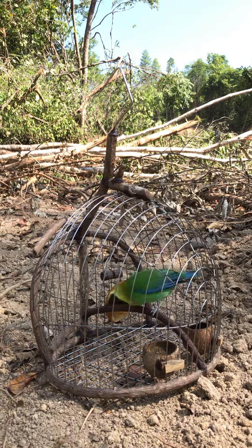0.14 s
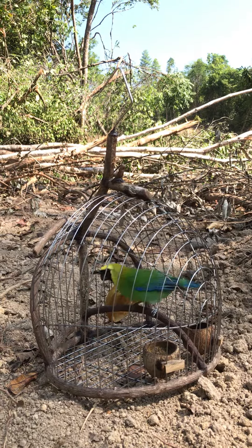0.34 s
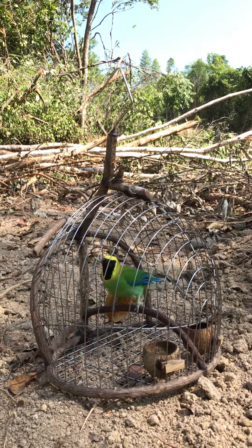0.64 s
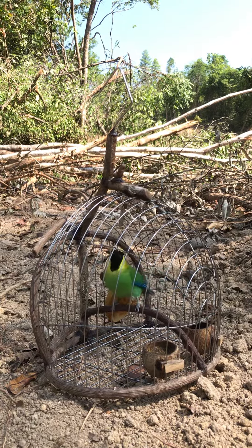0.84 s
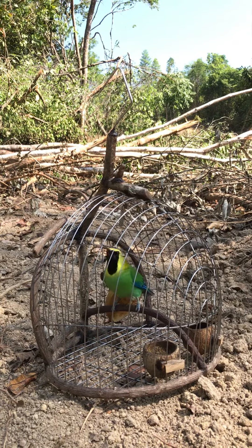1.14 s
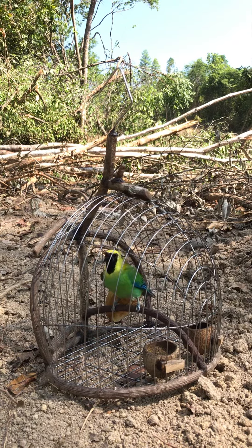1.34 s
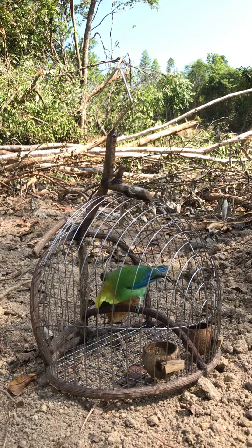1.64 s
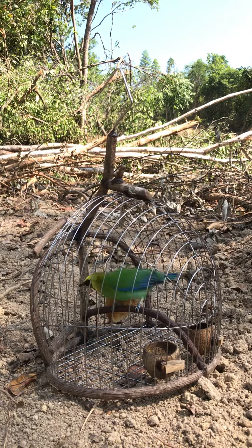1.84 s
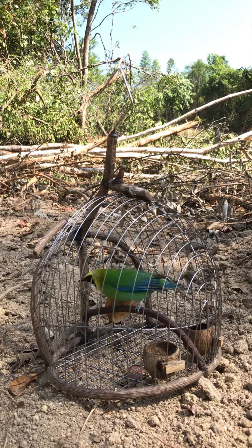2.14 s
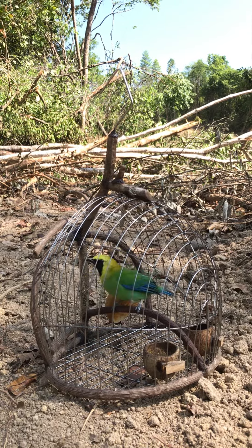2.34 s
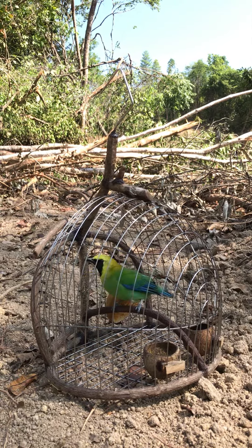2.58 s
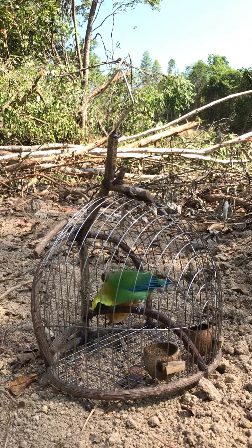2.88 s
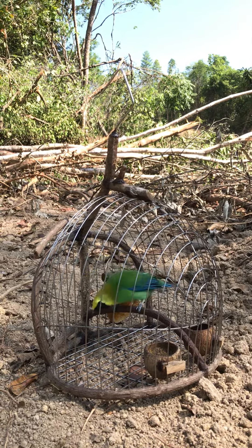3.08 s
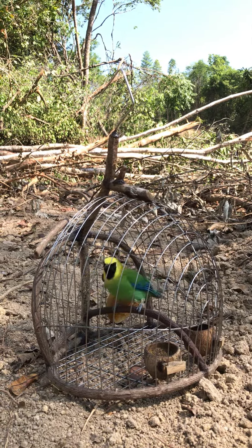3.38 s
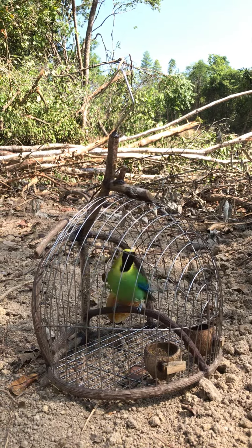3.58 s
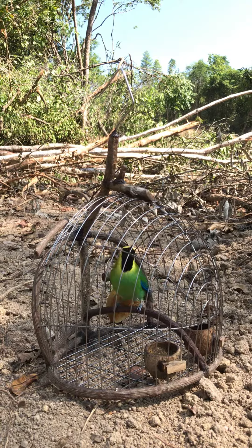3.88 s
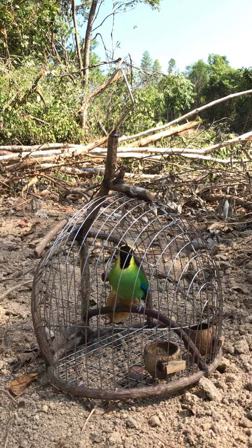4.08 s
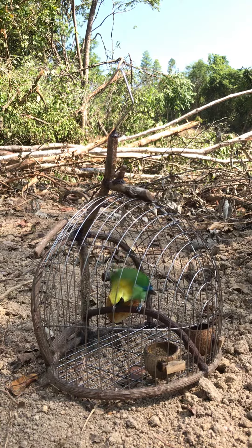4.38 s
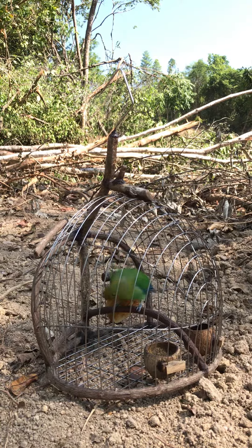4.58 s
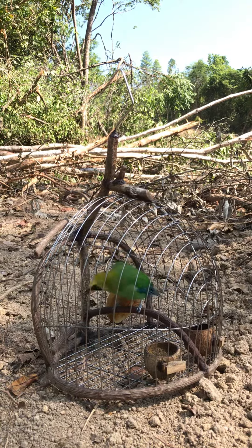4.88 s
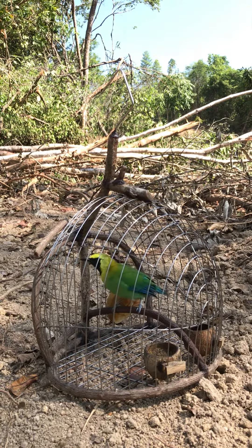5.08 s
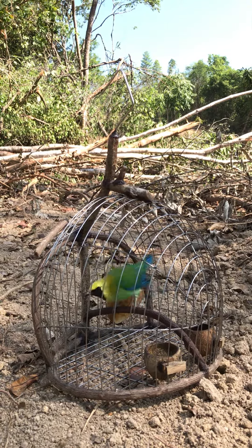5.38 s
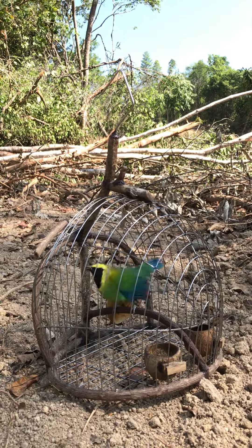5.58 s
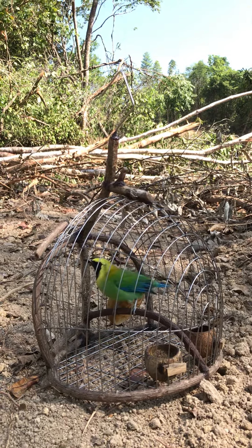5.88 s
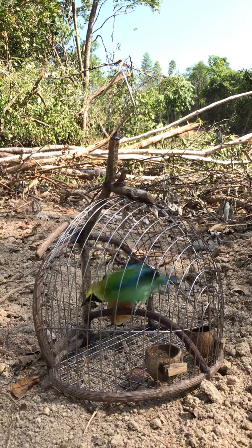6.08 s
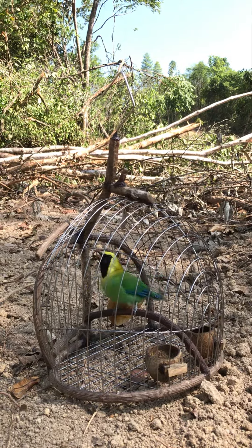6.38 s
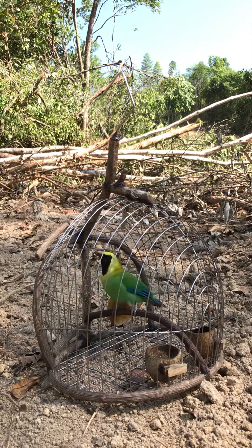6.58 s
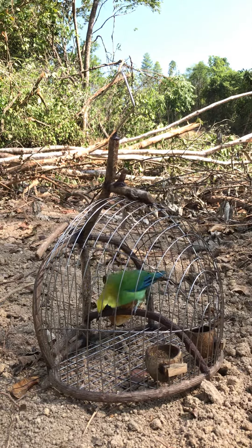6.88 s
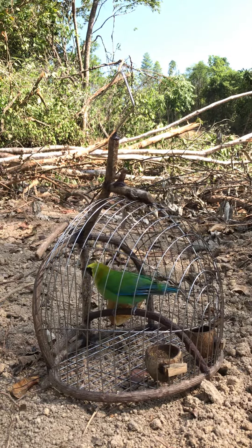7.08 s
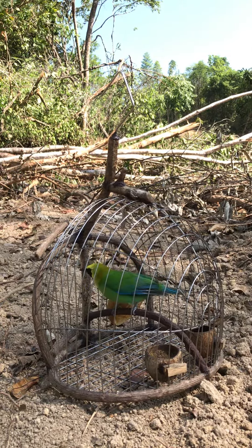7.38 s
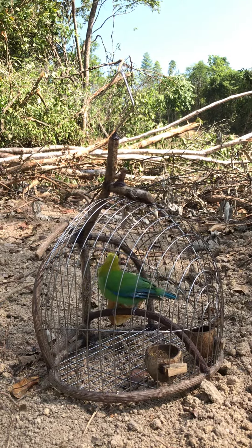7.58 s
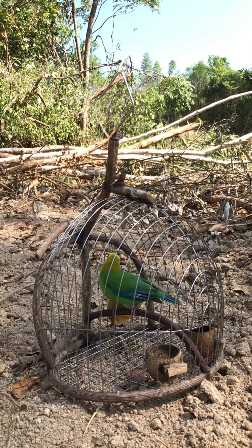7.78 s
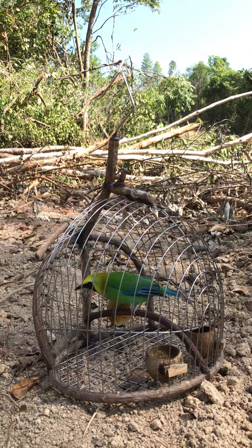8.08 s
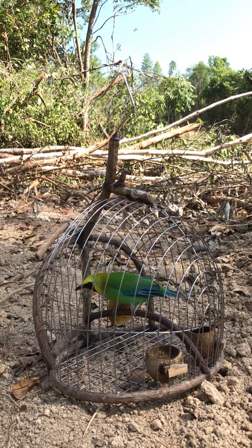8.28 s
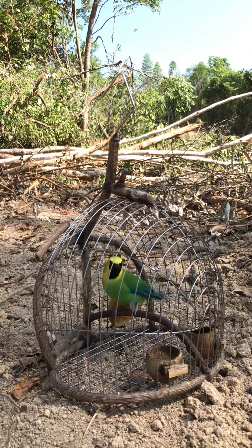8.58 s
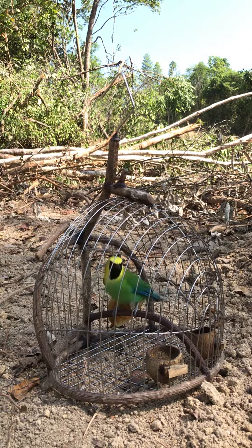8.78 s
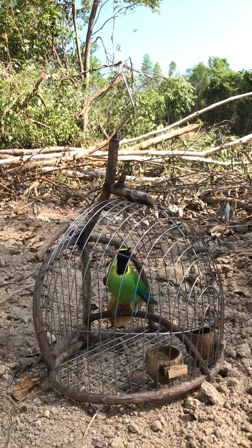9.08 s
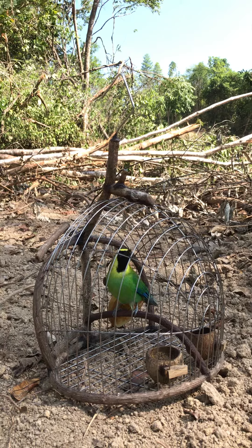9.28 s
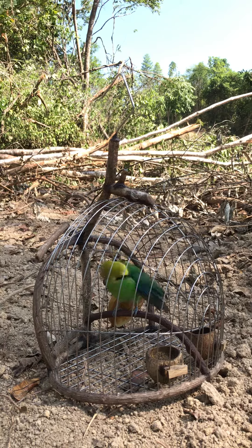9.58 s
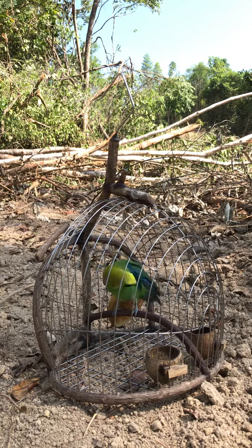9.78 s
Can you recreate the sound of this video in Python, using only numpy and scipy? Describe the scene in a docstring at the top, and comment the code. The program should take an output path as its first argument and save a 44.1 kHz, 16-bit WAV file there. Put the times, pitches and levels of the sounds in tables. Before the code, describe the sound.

Bright, gliding chirps from a nearby bird come in brief bursts, while an outdoor background of insects and low rumble fades and returns.

```python
"""A forest clearing sounds with cicada noise bands, a beating cricket tone, far birds, rumble and hum.
At 0.6 s a caged songbird whistles close by: short gliding tones with weak harmonics and a slight flutter.
At 2.4 s the background is turned far down. The bird sings at 3.5 s, ticks its claws on the cage wire
from 5.3 s and sings again from 5.5 s. At 7.2 s the background returns, far trills echo among the trees,
and the bird gives a last phrase at 8.9 s. From 9.4 s the background is down again."""
import sys
import numpy as np
from scipy import signal
from scipy.fft import rfft, irfft, next_fast_len
from scipy.io import wavfile
from scipy.ndimage import uniform_filter1d, map_coordinates

SR = 44100
rng = np.random.default_rng(int(sys.argv[2]) if len(sys.argv) > 2 else 0)


def wav_out(sig):
    """Save sig, one row per channel (or a flat mono array), as 16-bit PCM at SR to the path in sys.argv[1]."""
    wavfile.write(sys.argv[1], SR, np.round(np.clip(np.atleast_2d(sig).T, -1, 1) * 32767).astype(np.int16))


N = 438354
T = np.arange(N) / SR
COARSE = T[::64]  # time grid of slow controls [s]


def songbird():
    """Frequency modulation: each note is a gliding sine with weak harmonics locked to its phase."""
    # one curve a note: (time [s], pitch [Hz], level [dB])
    notes = [
        [(0.616, 2840, -43), (0.625, 2926, -33), (0.634, 3397, -26.5), (0.645, 3100, -21.5),
         (0.653, 2740, -24.5), (0.665, 2700, -26), (0.674, 2630, -42)],
        [(0.688, 2444, -19.5), (0.707, 2856, -22.5), (0.716, 2970, -14), (0.726, 2366, -29),
         (0.729, 2654, -23.5), (0.753, 2969, -16.5), (0.762, 2606, -33)],
        [(1.022, 2404, -40), (1.034, 2575, -24.5), (1.047, 3230, -19), (1.067, 2590, -18.5),
         (1.071, 2598, -17.5), (1.08, 2820, -36)],
        [(1.087, 3328, -29.5), (1.11, 3265, -21.5), (1.12, 3040, -17.5), (1.149, 3245, -15.5),
         (1.158, 3640, -16.5), (1.164, 3397, -9), (1.177, 3194, -34.5)],
        [(3.483, 2970, -47), (3.501, 2976, -30), (3.51, 3180, -30), (3.519, 2910, -46)],
        [(3.688, 3040, -43), (3.704, 2943, -34.5), (3.715, 3166, -28.5), (3.723, 3000, -49)],
        [(3.81, 1830, -44.5), (3.815, 2295, -48), (3.818, 2750, -31), (3.825, 2460, -29), (3.833, 2220, -42.5),
         (3.839, 2000, -37)],
        [(3.852, 3570, -35.5), (3.862, 3860, -28), (3.879, 3536, -26.5), (3.891, 3253, -23), (3.901, 3167, -19),
         (3.915, 2570, -31.5), (3.937, 2870, -27), (3.951, 2145, -33)],
        [(3.955, 2730, -37), (3.965, 2830, -27), (3.974, 2890, -32), (3.988, 2970, -25.5), (4.013, 2704, -36.5)],
        [(5.551, 3040, -40), (5.566, 2740, -37), (5.572, 2650, -41.5), (5.58, 2390, -38.5)],
        [(5.602, 1820, -49.5), (5.615, 2510, -42), (5.629, 2817, -30.5), (5.644, 2760, -34.5)],
        [(5.662, 2580, -41), (5.671, 3650, -33.5), (5.678, 3380, -28), (5.688, 3490, -24.5), (5.699, 3160, -25),
         (5.726, 2390, -31.5)],
        [(5.728, 2924, -31), (5.754, 3270, -22.5), (5.769, 3145, -32.5)],
        [(6.221, 5270, -33), (6.224, 5300, -47), (6.23, 4890, -47.5), (6.238, 5190, -57)],
        [(6.242, 5300, -41), (6.248, 4780, -40), (6.254, 4690, -32.5), (6.257, 4470, -39.5), (6.263, 4740, -33)],
        [(6.298, 1760, -44.5), (6.306, 3110, -42.5), (6.312, 3460, -24.5), (6.318, 3685, -35),
         (6.327, 2100, -33)],
        [(6.326, 2580, -30), (6.331, 3196, -28), (6.336, 3140, -24.5), (6.366, 2807, -25.5), (6.386, 2890, -37)],
        [(6.389, 3750, -35), (6.398, 3230, -24), (6.404, 3190, -21), (6.421, 2910, -47)],
        [(6.423, 4100, -23), (6.426, 4430, -29.5), (6.442, 4275, -29.5), (6.452, 4230, -35)],
        [(6.461, 2800, -46), (6.47, 3190, -28.5), (6.489, 3415, -24), (6.496, 3380, -31), (6.501, 3300, -33)],
        [(8.917, 2255, -29.5), (8.942, 1870, -36.5), (8.946, 1900, -43)],
        [(8.965, 3530, -22), (8.981, 2950, -17.5), (8.997, 3087, -16.5), (9.01, 2623, -16.5),
         (9.035, 2500, -26)],
        [(9.049, 2554, -36), (9.072, 2680, -19.5), (9.097, 3346, -17), (9.1, 3104, -10.5), (9.123, 2580, -30)],
        [(9.126, 3180, -29), (9.143, 2950, -19.5), (9.154, 2660, -36.5), (9.16, 3030, -29)],
    ]
    # brief dips inside a note, some with a pitch flick: (time [s], depth [dB], flick [Hz])
    dips = [(0.62, 13, 1900), (0.7192, 7.5, -5), (0.7392, 9, -8), (1.0468, 11, 0), (1.059, 11, -1),
            (1.112, 8.5, 1), (1.1572, 13.5, -2), (1.163, 12.5, 0), (3.5055, 17, 5), (3.7105, 12, 1),
            (3.829, 8, 0), (3.8825, 15.5, 804), (3.906, 9.5, -1), (3.9395, 8, 3), (3.975, 9.5, 5),
            (3.9948, 6, 2), (5.559, 17.5, -2), (5.5705, 7, -2), (5.673, 4.5, 198), (5.718, 7.5, -0.5),
            (5.744, 12.5, -7), (6.317, 12, 700), (6.344, 9, 1), (6.354, 13.5, 3), (6.41, 4.5, -2),
            (6.495, 4.5, 547), (8.975, 4.5, 1), (9.0054, 13, -3), (9.0785, 9, -9), (9.09, 6.5, -2),
            (9.101, 12, 0), (9.112, 15, 0)]
    # harmonics: (multiple, relative level [dB])
    overtones = [(2, -27.5), (3, -38), (4, -45)]
    # overtone lift as the beak faces the listener more or less: (time [s], gain [dB])
    facing = [(0.7, -7), (1.2, -4.5), (3.9, 0), (5.6, 0.5), (9, -6)]
    # colour of the overtones: (frequency [Hz], gain [dB])
    throat = [(4500, 0.5), (6500, -3), (8000, 1), (10000, 6), (12000, 4), (14000, -18.5)]
    attack_s, release_s = .0058, .0053
    dip_s, flick_s = .0013, .0027  # half widths
    song, lift = np.zeros(N), amp(np.interp(T, *np.transpose(facing)))
    for note in notes:
        s, hz, db = np.transpose(note)
        span = slice(round(s[0] * SR), round(s[-1] * SR))
        t = T[span]
        flicks = sum(flick * np.exp(-((t - at) / flick_s) ** 2) for at, _, flick in dips)
        pitch = uniform_filter1d(np.interp(t, s, hz), size=90) + flicks
        phase = 2 * np.pi * np.cumsum(pitch) / SR
        ramp = np.minimum((t - s[0]) / attack_s, (s[-1] - t) / release_s)
        edges = np.sin(np.pi / 2 * np.clip(ramp, 0, 1))
        envelope = amp(uniform_filter1d(np.interp(t, s, db), size=60)) * edges
        dips_db = sum(depth / (1 + ((t - at) / dip_s) ** 2) for at, depth, _ in dips)
        upper = sum(amp(level + along(throat, k * pitch)) * np.sin(k * phase) for k, level in overtones)
        upper *= amp(-0.4 * dips_db - 2.5) * edges * lift[span]
        song[span] += np.sqrt(2) * envelope * (amp(-dips_db) * np.sin(phase) + upper)
    return song


def glide_flutter(x, delay_s=.004535, gain_db=-14.5):
    """Interference: a faint delayed copy makes the level flutter during fast glides."""
    return amp(gain_db) * np.pad(x, (round(delay_s * SR), 0))[:N]


def note_halo(x, t60_s=0.067, gain_db=-18):
    """Convolution with decaying noise: a short, soft fuzz trails each note."""
    t = np.arange(SR // 10) / SR
    halo = amp(-60 * t / t60_s) * rng.standard_normal(len(t))
    return amp(gain_db) * signal.fftconvolve(x, halo / np.linalg.norm(halo))[:N]


def claws():
    """Impact excitation: claws shifting on the cage wire give a noisy scratch and a damped knock."""
    # claw contacts: (time [s], level [dB], relative knock level [dB])
    ticks = [(5.283, -63, 2), (5.2925, -58.5, -11.5), (5.313, -59.5, -13), (5.513, -57.5, -17),
             (5.541, -57, -1), (5.565, -65, -1), (5.783, -58, -5.5), (5.8045, -59, -9), (5.8174, -59, -15),
             (6.063, -59.5, -12.5), (6.0731, -55.5, -7.5), (6.1, -63, 6)]
    # colour of a tick: (frequency [Hz], gain [dB])
    wire = [(600, 2), (2300, -1), (11500, -3), (14000, -27)]
    rise_s, scratch_t60_s, knock_t60_s = 0.00055, 0.056, 0.018
    out, t = np.zeros(N), np.arange(SR // 40) / SR
    for s, db, knock_db in ticks:
        scratch = amp(-60 * t / scratch_t60_s) * (1 - np.exp(-t / rise_s)) * rng.standard_normal(len(t))
        knock = amp(knock_db - 3.5 - 60 * t / knock_t60_s) * np.sin(2 * np.pi * rng.normal(2000, 250) * t)
        out[round(s * SR):][:len(t)] += amp(db + 2) * (scratch + knock)
    return filtered(out, lambda f: amp(along(wire, f)))


def cicada_chorus():
    """Incoherent summation: independent bands of cicadas swell, fade and draw together in pitch."""
    # cicada bands: (centre [Hz], spread [Hz], level [dB])
    bands = [(3425, 140, -55), (6843, 260, -59.5), (9890, 250, -71), (10844, 380, -71.5), (13400, 230, -47),
             (14010, 240, -53)]
    # course of the chorus: (time [s], low-band gain [dB], high-band gain [dB], share of the spread)
    swell = [(0, -0.5, 1.5, 1), (3, 1, 0, 1), (5.2, -1, -0.5, .6), (6, -3, -7, .7), (7.3, -1.5, -1.5, 1.1),
             (9.94, -2.5, -1.5, 1)]
    s, low_db, high_db, share = np.transpose(swell)
    out = np.zeros(N)
    for hz, spread, db in bands:
        swell_db = np.interp(T, s, high_db if hz > 9000 else low_db)
        out += amp(db + swell_db + 1.1 * wobble(3.7)) * cicada_band(hz, spread * share, s)
    return out


def cicada_band(hz, spread_hz, s, voices=5, clear_above_hz=5000):
    """Narrow-band noise: many voices merge into a rasp; in high bands single gliding tones stand out."""
    f, t, z = signal.stft(rng.standard_normal(N), SR, nperseg=1024)
    detuning = (f[:, None] - hz) / np.interp(t, s, spread_hz)
    gain = amp(1.5 * patches(z.shape, bins=10, frames=6))
    shape = 1 / np.cosh(np.clip(1.4 * detuning, -50, 50)) + 0.13 / (1 + (detuning / 3) ** 2)
    rasp = unit(signal.istft(z * shape * gain, nperseg=1024)[1][:N])
    if hz < clear_above_hz:
        return rasp
    curves = [np.transpose([s, hz + step * spread_hz, 0 * s]) for step in rng.uniform(-1.5, 1.3, voices)]
    tones = sum(tone(rows, blur_hz=5, flicker_db=3.5, drift_hz=.4 * spread_hz.mean()) for rows in curves)
    return unit(rasp + .8 * unit(tones))


def single_insects():
    """Amplitude modulation: thin gliding tones, some flickering, others nearly steady."""
    # one curve a flickering insect: (time [s], pitch [Hz], level [dB])
    flickering = [
        [(1.15, 14560, -62), (2.6, 14310, -54), (3.2, 14030, -50), (5, 13600, -53), (6.7, 13050, -58)],
        [(5.1, 13400, -51), (6.3, 13620, -52), (7.2, 13950, -54)],
        [(5, 13600, -55), (7, 14120, -54)],
        [(4.7, 12820, -62), (6.4, 13200, -57)],
        [(2.5, 13560, -53), (4.8, 13060, -56)],
        [(0, 5130, -79), (9.94, 5325, -74.5)],
        [(7.55, 3640, -62), (8.65, 3570, -64)],
        [(0, 13670, -46), (1.2, 13450, -56.5), (2.4, 13400, -39)],
        [(7, 13100, -57.5), (7.7, 13200, -54.5), (8.5, 13430, -49.5), (9.4, 13680, -66)],
        [(7.55, 14600, -62), (8.5, 14310, -56), (9.4, 14110, -56)],
        [(2.7, 14500, -56), (4.9, 14020, -61.5)],
        [(2.5, 13850, -58), (4.6, 13380, -56.5)],
        [(5.6, 13900, -60), (7.1, 14450, -58)],
        [(7.55, 5150, -72), (7.75, 5070, -62), (8.6, 5153, -67.5), (9.94, 5252, -58.5)],
    ]
    # one curve a steady insect: (time [s], pitch [Hz], level [dB])
    steady = [
        [(0, 4264, -74.5), (2.5, 4397, -72)],
        [(7.2, 4426, -72), (9.4, 4470, -71)],
        [(2.4, 6260, -74), (5.4, 6220, -68)],
    ]
    out = sum(tone(rows, blur_hz=8.8, flicker_db=3.5) for rows in flickering)
    return out + sum(tone(rows, blur_hz=6.2, flicker_db=0.7) for rows in steady)


def cricket():
    """Beating: two close spectral lines and a faint third above make an unevenly swelling whine."""
    # the whine: (time [s], main line [Hz], level [dB], line spacing [Hz])
    whine = [(0, 5350, -53, 88.8), (2.3, 5406, -54, 69.3), (5, 5450, -55.5, 63.74),
             (7.4, 5510, -55.5, 54.7), (9.94, 5603, -58, 52.9)]
    # its lines: (offset [spacings], relative level [dB])
    lines = [(-1, -1), (0, 0), (1, -17)]
    s, hz, db, spacing = np.transpose(whine)
    curves = [np.transpose([s, hz + step * spacing, db + level]) for step, level in lines]
    return sum(tone(rows, blur_hz=3.5, flicker_db=3.5) for rows in curves) * amp(wobble(16))


def far_birds():
    """Reverberant field: two far whistles and hoarse trills of widening up-slurs arrive mostly as echo."""
    # one curve a whistle: (time [s], pitch [Hz], level [dB])
    whistles = [
        [(0, 2690, -50), (0.058, 2950, -49), (0.078, 3250, -40), (0.093, 3490, -45)],
        [(8.797, 3400, -40.5), (8.815, 3620, -50.5)],
    ]
    # trills: (time [s], length [s], first pitch [Hz], last pitch [Hz], full slur rise [Hz], level [dB])
    trills = [(2.27, 0.4, 5090, 3486, 716, -55.5), (4.428, 0.41, 4860, 3544, 698, -56),
              (6.861, 0.41, 4970, 3455, 702, -55.5), (8.126, 0.15, 2430, 2414, 200, -57),
              (8.185, 0.144, 2870, 2830, 397, -49), (8.604, 0.32, 4870, 3890, 684, -52.5)]
    slurs_per_s, first_width, dip_share = 36, .4, .4
    out = sum(tone(rows, blur_hz=7.2, flicker_db=-2, fade_s=0.011) for rows in whistles)
    for s, length, from_hz, to_hz, slur_hz, db in trills:
        t = np.arange(round(length * SR)) / SR
        slur = (t * slurs_per_s) % 1
        width = first_width + (1 - first_width) * t / length
        hoarse = 200 * wobble(300)[:len(t)]
        hz = from_hz + (to_hz - from_hz) * t / length + width * (slur_hz * (slur - .5) + hoarse)
        envelope = (1 - dip_share * np.cos(np.pi * slur) ** 2) * signal.windows.tukey(len(t), .3)
        out[round(s * SR):][:len(t)] += amp(db - 2) * envelope * np.sin(2 * np.pi * np.cumsum(hz) / SR)
    return out + 1.25 * tree_echoes(out, delay_s=0.0045)


def tree_echoes(x, delay_s):
    """Reverberation: scattering from the trees gives an exponentially decaying tail of unit energy."""
    # decay among the trees: (frequency [Hz], reverberation time [s])
    t60 = [(2000, 1.04), (6000, 0.9)]
    hz, t, z = signal.stft(rng.standard_normal(SR), SR, nperseg=256)
    tail = signal.istft(z * amp(-60 * t / along(t60, hz)[:, None]), SR, nperseg=256)[1]
    return signal.fftconvolve(x, np.pad(tail, (round(delay_s * SR), 0)) / np.linalg.norm(tail))[:N]


def air(low_cut_hz=40):
    """Broadband noise: rumble and moving air carry most of their energy at low frequencies."""
    # spectrum of the air: (frequency [Hz], relative density [dB])
    spectrum = [(15, -43), (25, -19.5), (62, -4.5), (80, -2.5), (123, -11.5), (185, -15.5), (234, -16),
                (418, -27), (549, -27), (629, -30), (1020, -28), (1730, -35.5), (2600, -42.5),
                (3380, -70.5), (5720, -120)]
    gain = amp(-54.5 + 0.49 * wobble(12))
    return gain * noise(lambda f: amp(along(spectrum, f)) * f**4 / (f**4 + low_cut_hz**4), patchy_db=1.5)


def hum():
    """Harmonic series: multiples of a firing rate, perhaps a far engine, over a lower, steadier tone."""
    # the hum: (time [s], firing rate [Hz], level [dB])
    firing = [(0, 26.46, -55), (2.4, 25.95, -54.5), (2.9, 23.53, -54), (3.9, 23.14, -52),
              (5.3, 24.52, -56.5), (6, 25.9, -58.5), (9.94, 26.35, -53.5)]
    # its harmonics: (multiple, relative level [dB])
    orders = [(3, 0), (4, -13), (6, -15)]
    # the lower tone: (time [s], pitch [Hz], level [dB])
    drone = [(0, 51.5, -67.5), (5.5, 52.2, -61.5), (7, 51.7, -60.5), (9.94, 52.55, -61.5)]
    harmonics = sum(amp(db) * tone(np.multiply(firing, (1, k, 1)), 0.77, flicker_db=4.7, drift_hz=0.97)
                    for k, db in orders)
    return harmonics + tone(drone, blur_hz=.8, flicker_db=5)


def hiss():
    """High-passed noise: a faint, even floor in the treble."""
    # spectrum of the hiss: (frequency [Hz], relative density [dB])
    spectrum = [(1500, -14), (2800, -4.5), (4000, -0.5), (4800, -4), (6000, 4), (8300, -5), (12000, 3),
                (14800, -5.5), (15300, -32)]
    return amp(-66) * noise(lambda f: amp(along(spectrum, f)) * (f > 1500), patchy_db=0.64)


def tone(rows, blur_hz, flicker_db, drift_hz=0, fade_s=.2):
    """Random modulation: a sine wavers about rows of (time [s], pitch [Hz], level [dB])."""
    s, hz, db = np.transpose(rows)
    start, end = s[0] - fade_s, s[-1] + fade_s
    level_db = np.interp(COARSE, [start, *s, end], [-110, *db, -110]) + flicker_db * slow(9.7)
    pitch = np.interp(COARSE, s, hz) + blur_hz * slow(30) + drift_hz * slow(.3)
    phase = np.interp(T, COARSE, 2 * np.pi * np.cumsum(pitch) * COARSE[1])
    envelope = np.interp(T, COARSE, amp(level_db)) * ((T > start) & (T < end))
    return np.sqrt(2) * envelope * np.sin(phase)


def noise(response, patchy_db):
    """Spectral shaping: coloured noise of rms 1 with patches of random gain."""
    z = signal.stft(rng.standard_normal(N), nperseg=512)[2]
    z = z * amp(patchy_db * patches(z.shape, bins=5, frames=12))
    return unit(filtered(signal.istft(z, nperseg=512)[1][:N], response))


def patches(shape, bins, frames):
    """Moving average: a random field of rms 1, smooth in frequency and time."""
    return unit(uniform_filter1d(uniform_filter1d(rng.standard_normal(shape), bins, 0), frames, 1))


def filtered(x, response):
    """Linear filtering: the spectrum of x times a frequency response."""
    m = next_fast_len(N + SR // 2)
    return irfft(rfft(x, m) * response(np.fft.rfftfreq(m, 1 / SR)), m)[..., :N]


def slow(rate):
    """Spline interpolation: a random curve on the coarse grid, rate knots a second."""
    return map_coordinates(rng.standard_normal(int(N * rate / SR) + 4), [COARSE * rate])


def wobble(rate):
    """Upsampling: a slow random curve with one value per sample."""
    return np.interp(T, COARSE, slow(rate))


def along(points, hz):
    """Interpolation of (frequency [Hz], value) points on a log axis."""
    f, v = np.transpose(points)
    return np.interp(np.log(hz + 1), np.log(f + 1), v)


def amp(db):
    """Decibels to amplitude ratio."""
    return 10 ** (np.asarray(db) / 20)


def unit(x):
    """Normalisation to rms 1."""
    return x / np.sqrt(np.mean(x ** 2) + 1e-20)


def scene():
    """Superposition: near sounds hold their level; the background and the song's echo go down twice."""
    # background at full level: (start [s], end [s])
    full_spans = [(0, 2.38), (7.195, 9.422)]
    # background when turned down: (frequency [Hz], gain [dB])
    turned_down = [(40, -18), (90, -19), (250, -13), (1200, -10.5), (2500, -8.5), (3400, -20.5),
                   (4300, -12.5), (5400, -19), (7000, -16), (10000, -15), (13500, -29.5)]
    song = songbird()
    song = song + glide_flutter(song)
    far = air() + hum() + hiss() + cicada_chorus() + single_insects() + cricket() + far_birds()
    far += amp(-34) * tree_echoes(song, delay_s=0.05)
    faint = filtered(far, lambda f: amp(along(turned_down, f)))
    full = uniform_filter1d(sum((T >= a) & (T < b) for a, b in full_spans) * 1., size=600)
    return (song + note_halo(song) + claws() + full * far + (1 - full) * faint)[None]


def record(dry):
    """Band limiting: the phone passes nothing above 15650 Hz."""
    return filtered(dry, lambda hz: hz < 15650)


dry = scene()
out = record(dry)
wav_out(out)
```